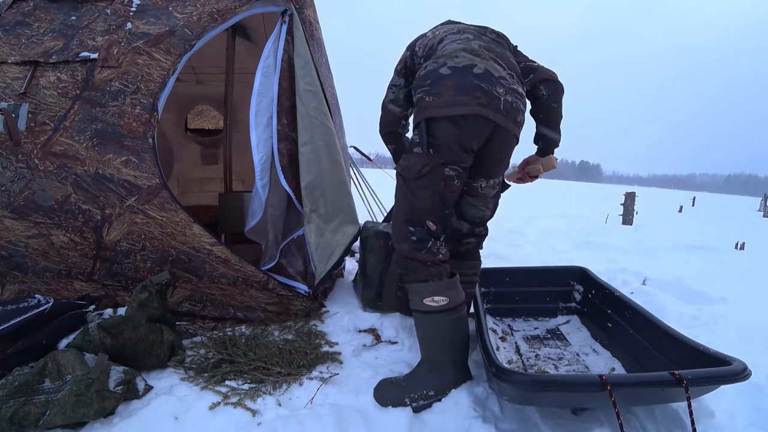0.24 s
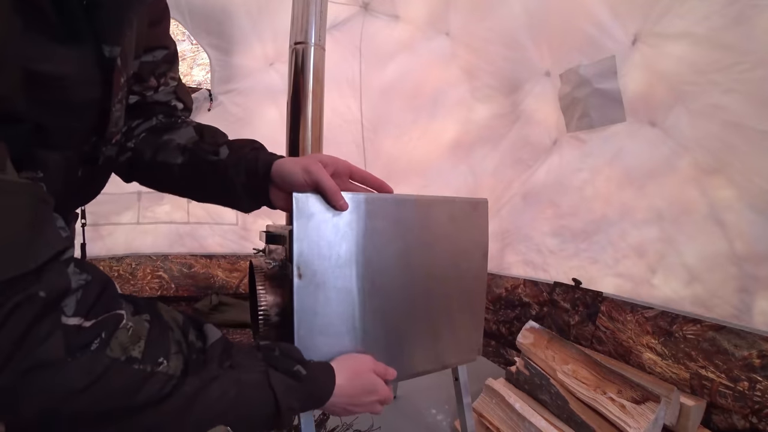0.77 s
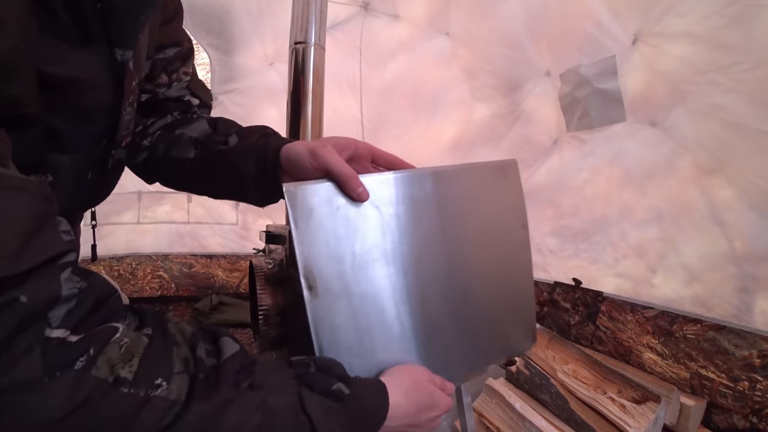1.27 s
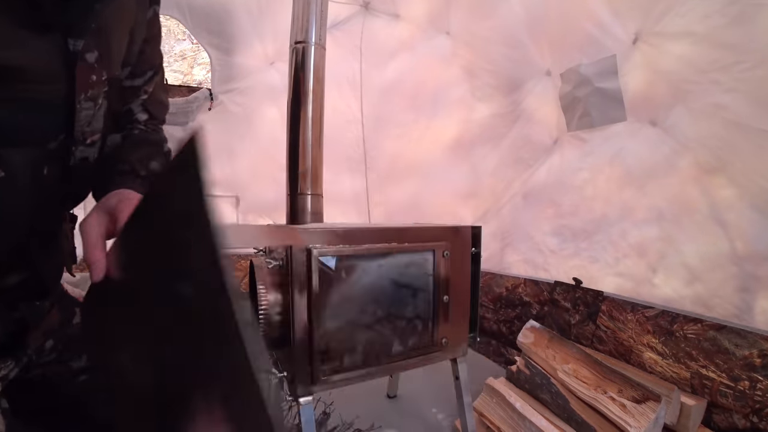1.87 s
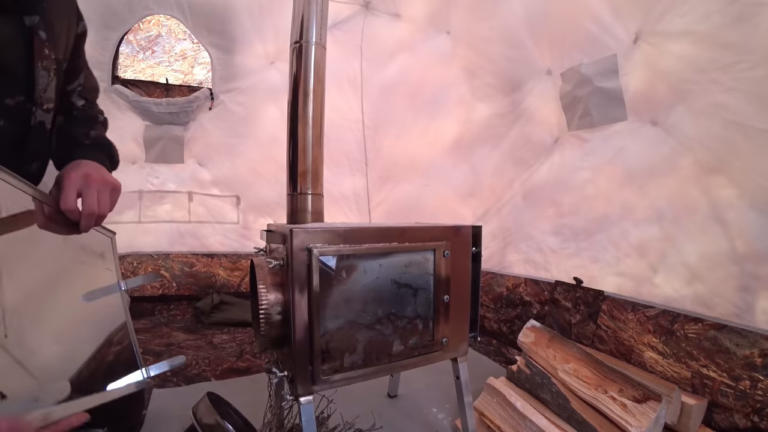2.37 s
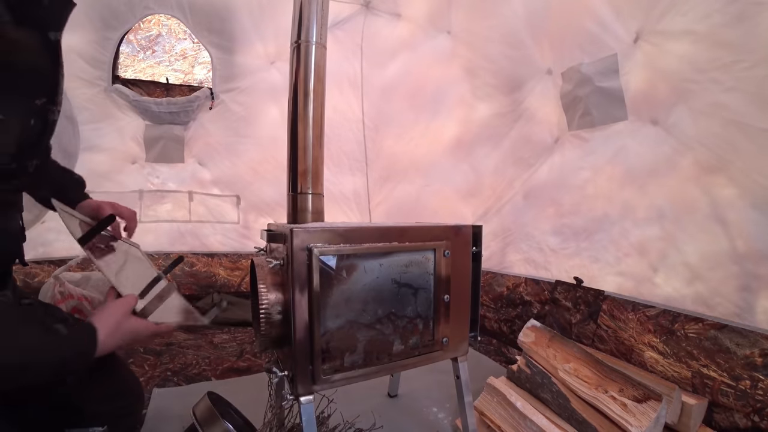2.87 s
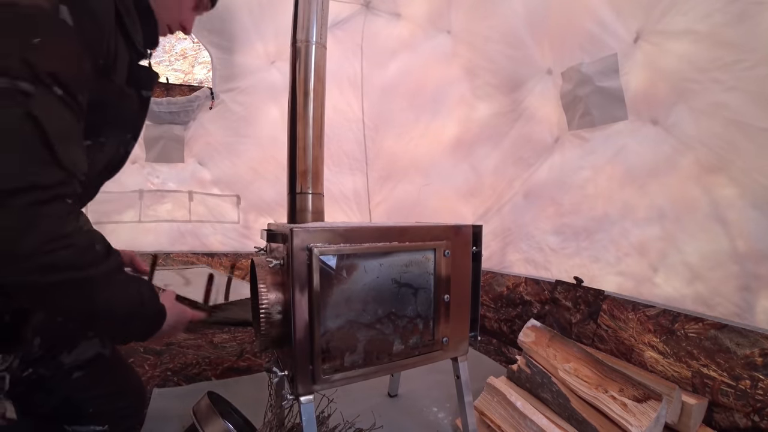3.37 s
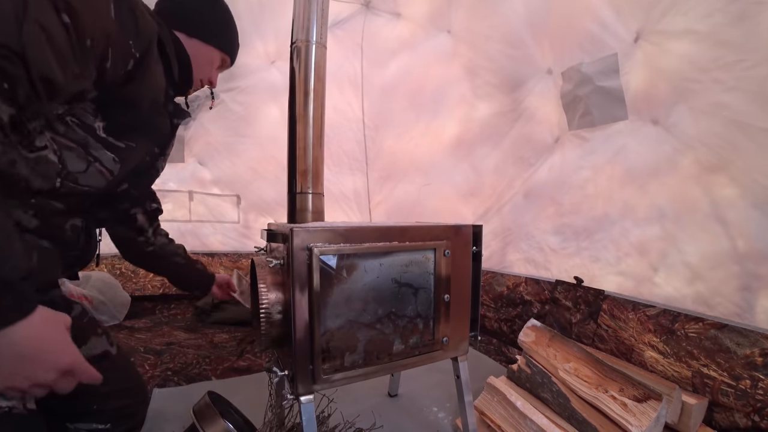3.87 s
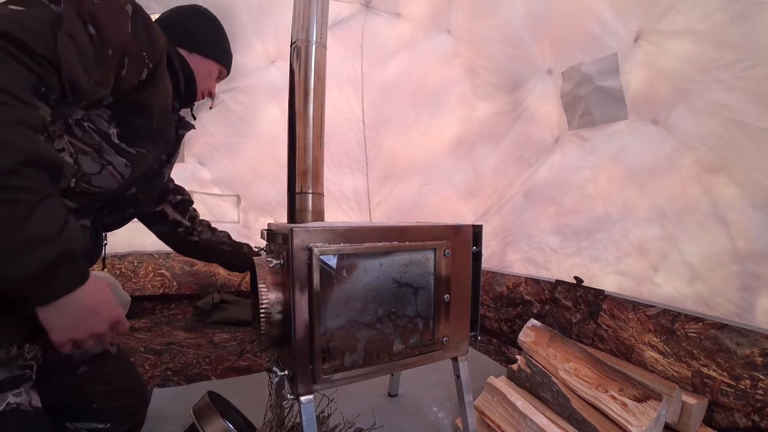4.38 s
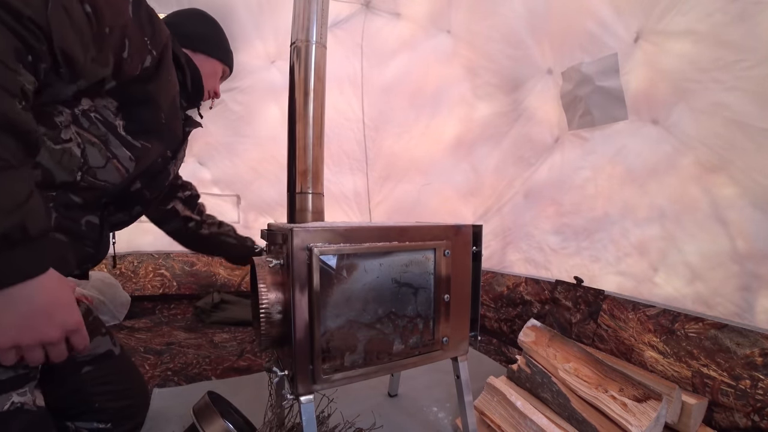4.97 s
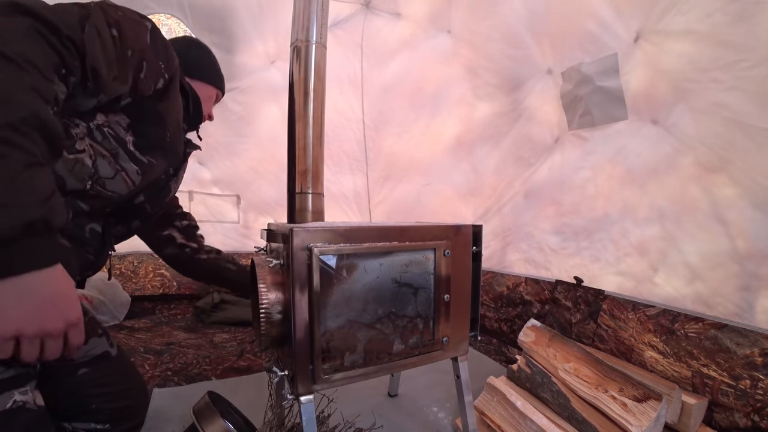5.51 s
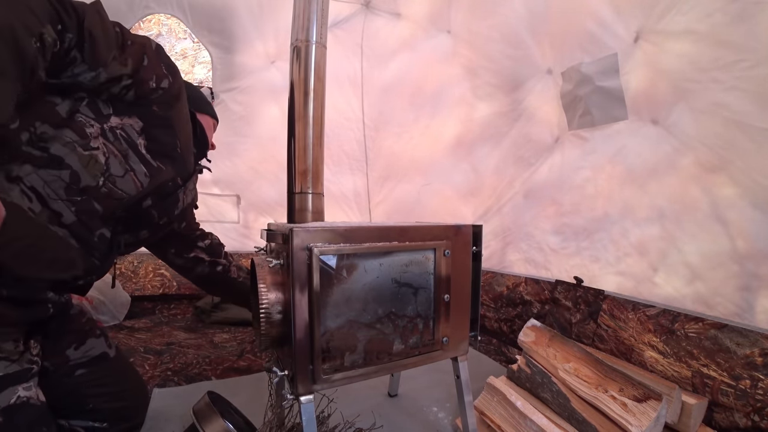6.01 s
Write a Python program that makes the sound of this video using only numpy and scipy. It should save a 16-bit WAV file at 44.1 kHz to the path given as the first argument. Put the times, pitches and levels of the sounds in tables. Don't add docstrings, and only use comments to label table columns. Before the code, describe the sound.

A gust and small snaps cut to a hushed tent: sheet metal scrapes and bangs, clothing rustles, a stove door groans, clanks, clicks, wood knocks.

```python
import sys
import numpy as np
from scipy import signal
from scipy.fft import rfft, irfft
from scipy.io import wavfile

SR = 44100
rng = np.random.default_rng(int(sys.argv[2]) if len(sys.argv) > 2 else 0)


def amplitude_ratio(level_db):
    exponent = np.asarray(level_db, float) / 20
    return 10 ** exponent


def bounce(signal):
    frames = np.transpose(np.atleast_2d(signal))
    limited = np.clip(frames, -1, 1)
    pcm = np.round(limited * 32767).astype(np.int16)
    wavfile.write(sys.argv[1], SR, pcm)


N = 275625
INDOORS_S = 0.58

# [f/Hz, side minus mid/dB]
SOFT_SIDE = [(60, -22), (110, -8), (200, -7.5), (380, -4), (700, -0.5), (1290, 0), (2380, -5), (4400, -8),
             (8120, -5), (15000, -6)]
# [f/Hz, level/dB]
SHEET_CROWD = [(40, -42), (100, -6), (500, -5), (1000, -6.5), (2200, -7.5), (4200, -6), (7000, -11.5),
               (9500, -20), (11500, -16), (15500, -31)]
# [f/Hz, level/dB]
STOVE_CROWD = [(60, -41), (170, -10), (330, -13), (480, -8), (1070, -11), (2530, -6.5), (6260, -10),
               (9500, -23), (15500, -31.5)]


def colour(x, table):
    hz, db = np.transpose(table)
    log_hz = np.log(np.arange(1, x.shape[-1] // 2 + 2) * SR / x.shape[-1])
    return irfft(rfft(x) * amplitude_ratio(np.interp(log_hz, np.log(hz), db)), x.shape[-1])


def band(x, lo_hz, hi_hz):
    y = signal.sosfilt(signal.butter(2, [lo_hz, hi_hz], "bandpass", fs=SR, output="sos"), x)
    return y / np.sqrt(np.mean(y ** 2))


def curves(tables, rest_db):
    rows = []
    for span in map(np.array, tables):
        if rest_db is not None:
            quiet = np.full(span.shape[1] - 1, rest_db)
            before = np.r_[span[0, 0] - 0.006, quiet]
            after = np.r_[span[-1, 0] + 0.006, quiet]
            span = np.vstack([before, span, after])
        rows.append(span)
    s, *columns = np.vstack(rows).T
    return [np.interp(np.arange(N) / SR, s, c) for c in columns]


def swells(at_s, rise_s, fall_s, peak_db):
    t = np.arange(0, N, 32) / SR
    late = t - at_s[:, None]
    drop_db = 10 * np.maximum(-late / np.abs(rise_s)[:, None], late / np.abs(fall_s)[:, None])
    same_place = (at_s[:, None] < INDOORS_S) == (t < INDOORS_S)
    power = 1e-12 + (same_place * amplitude_ratio(peak_db[:, None] - drop_db) ** 2).sum(axis=0)
    return np.interp(np.arange(N) / SR, t, 10 * np.log10(power))


def wide(mid, other, side_db):
    side = colour(other, side_db)
    return np.array([mid + side, mid - side])


def pan(db):
    return amplitude_ratio(np.array([[db], [-db]]) / 2)


def grit(rate_hz, spread_db, size=N):
    hit = rng.random((2, size)) < rate_hz / SR
    big = np.minimum(rng.exponential(size=(2, size)), 3)
    return hit * rng.standard_normal((2, size)) * amplitude_ratio(spread_db * big)


def hum(table, rough_db):
    hz, db = curves(table, None)
    start, end = table[0][0][0], table[0][-1][0]
    held = np.interp(np.arange(N) / SR, [start - 0.02, start, end, end + 0.02], [0, 1, 1, 0])
    db = db + rough_db * band(rng.standard_normal(N), 6.3, 44.0)
    return held * np.sqrt(2) * amplitude_ratio(db) * np.sin(2 * np.pi * np.cumsum(hz) / SR)


def steel(modes, shape, crowd_db, t60_low, t60_high, blows=(), scrape=None, rub_db=0.0):
    # [f/Hz, side minus mid/dB]
    steel_side = [(100, -14), (500, -12.5), (1500, -11), (3000, -11), (8000, -7), (15000, -9)]
    t = np.arange(SR // 3) / SR
    hz, db, t60 = np.transpose(modes)[:, :, None]
    swing = amplitude_ratio(db - 60 * t / t60) * np.exp(2j * np.pi * hz * t)
    detune_hz = hz * 0.015 * rng.uniform(-1, 1, hz.shape)
    swing = swing * (1 + 0.45 * np.exp(2j * np.pi * detune_hz * t))

    def body(modes_db, place_db):
        gain = amplitude_ratio(place_db * rng.standard_normal(len(modes)))
        share = gain * np.exp(2j * np.pi * rng.random((2, len(modes))))
        lines = rng.random(len(t) // 2 + 1) < 0.14
        crowd = colour(irfft(lines * rfft(rng.standard_normal((2, len(t))))), shape)
        low = signal.sosfilt(signal.butter(1, 2500, fs=SR, output="sos"), crowd)
        fading = low * amplitude_ratio(-60 * t / t60_low) + (crowd - low) * amplitude_ratio(-60 * t / t60_high)
        both = amplitude_ratio(modes_db) * (share @ swing).imag + amplitude_ratio(crowd_db) * fading / crowd.std()
        both = wide(*both, steel_side) * np.minimum(t / 0.00093, 1)
        return both / np.abs(both).max()

    sharp, dull = np.zeros((2, 2, N + len(t)))
    for s, peak_db, dull_db, pan_db in blows:
        sound = body(0.0, 1.5) * pan(pan_db)
        sharp[:, int(s * SR):][:, :len(t)] += amplitude_ratio(peak_db) * sound
        dull[:, int(s * SR):][:, :len(t)] += amplitude_ratio(dull_db + 7.5) * sound
    if scrape:
        rows = [[(s, db, db + under_db) for s, db in curve] for under_db, curve in scrape]
        sharp_db, dull_db = curves(rows, -110.0)
        a, b = int(rows[0][0][0] * SR) - 300, int(rows[-1][-1][0] * SR) + 300
        place = np.repeat(rng.integers(0, 4, N // 530 + 1), 530)[:b - a]
        slips = grit(6000, 1.4, size=b - a)
        for k in range(4):
            sound = body(rub_db, 3.0)
            push = slips * (place == k) / slips.std() / np.sqrt((sound ** 2).sum() / 2)
            sharp_push = amplitude_ratio(sharp_db[a:b]) * push[:1]
            dull_push = amplitude_ratio(dull_db[a:b] + 12.0) * push[1:]
            sharp[:, a:b + len(t) - 1] += signal.oaconvolve(sharp_push, sound, axes=1)
            dull[:, a:b + len(t) - 1] += signal.oaconvolve(dull_push, sound, axes=1)
    heard = np.flatnonzero(sharp[0])
    heard = slice(heard[0], heard[-1])
    hard = signal.sosfilt(signal.butter(2, 900, "high", fs=SR, output="sos"), sharp[:, heard])
    soft = signal.sosfilt(signal.butter(2, 900, fs=SR, output="sos"), dull[:, heard])
    sharp[:, heard] = soft * pan(-2.3) - hard
    return sharp[:, :N]


def ports(x):
    # [f/Hz, lead of the left port/rad]
    steel_lead = [(100, -.2), (400, -.55), (950, -.45), (2150, -.14), (3800, 0.), (15000, -.1)]
    hz, lead = np.transpose(steel_lead)
    turn = np.interp(np.log(np.arange(1, N // 2 + 2) * SR / N), np.log(hz), lead)
    return irfft(rfft(x) * np.exp(0.5j * turn * np.array([[1], [-1]])), N)


def air():
    # [t/s, level/dB]
    wind = [
        (0.0, -43),
        (0.134, -38),
        (0.358, -42),
        (0.43, -37.5),
        (0.5, -43.5),
        (0.56, -45),
        (0.578, -50),
    ]
    # [t/s, rise/s per 10 dB, fall/s per 10 dB, level/dB]
    jolts = [
        (0.69, .1, -0.3, -54),
        (0.94, -0.5, .05, -52),
        (1.15, 0.1, 0.08, -41),
        (1.36, .02, -0.07, -43),
        (4.2, 0.5, 0.3, -65),
    ]
    # [f/Hz, level/dB]
    tent = [(15, -25), (25, -8), (79, -1), (148, -5), (260, -11.5), (582, -8), (997, -10.5), (1140, -9),
            (1300, -12.5), (1660, -10.5), (5580, -12), (8130, -21.5), (15500, -24)]
    still_air_db, hush_db = -73.5, -61.5
    push = amplitude_ratio(curves([wind], -110.0)[0]) + amplitude_ratio(swells(*np.transpose(jolts))) + amplitude_ratio(still_air_db)
    gusts = push * band(rng.standard_normal(N), 5.8, 43.5)
    hush = wide(*colour(rng.standard_normal((2, N)), tent), SOFT_SIDE)
    uneven = amplitude_ratio(-11.5) * gusts * np.array([[1], [-1]]) * band(rng.standard_normal(N), 1, 11)
    return gusts * pan(1.4) + uneven + amplitude_ratio(hush_db) * hush / hush.std()


def thuds():
    # [t/s, peak/dB, f/Hz]
    knocks = [(0.903, -36, 290), (0.943, -41, 140), (0.999, -35, 146), (1.137, -32.5, 241),
              (1.59, -41, 100), (1.657, -44, 78.1), (2.658, -46.5, 387), (2.772, -35, 113),
              (2.81, -47, 123), (3.278, -44.5, 190), (3.315, -48, 185), (3.41, -52, 94.2),
              (3.481, -37, 138), (3.616, -41, 104), (3.681, -45.5, 105), (3.796, -51, 106),
              (4.413, -48, 119), (4.962, -50, 106.6)]
    out, t = np.zeros(N + SR), np.arange(SR // 5) / SR
    for s, db, hz in knocks:
        out[int(s * SR):][:len(t)] += amplitude_ratio(db - 60 * t / 0.08) * np.sin(2 * np.pi * hz * t)
    return out[:N]


def clothes():
    # [t/s, rise/s per 10 dB, fall/s per 10 dB, hiss/dB]
    rustle = [ (0.08, 4, 0.3, -48.5), (0.27, 0.1, .05, -50.5), (0.36, .03, .02, -51),
              (0.43, .015, .05, -52), (0.575, 0.27, .02, -49), (0.67, 0.2, .5, -53), (1.6, .04, .5, -63),
              (1.97, 0.3, 0.35, -52), (2.52, .03, .06, -53), (2.555, .04, 0.06, -51), (2.7, .07, .04, -51),
              (2.79, 0.08, .06, -52), (2.915, .06, 0.08, -56), (3.2, .15, .2, -61),
              (3.27, -0.3, 0.16, -55.5), (3.49, 0.1, 0.16, -57), (3.61, 0, 0.57, -61),
              (4.038, 0.0267, 0.0436, -37.5), (4.243, 0.01, 0.31, -46.5), (4.576, 0.24, 0.04, -44),
              (4.86, 0.4, 0.02, -55.5), (4.966, 1, -1, -64.5), (5.13, 0.14, .3, -59), (5.39, 1, .04, -63),
              (5.75, .25, 5, -60), (6.02, 0.07, 0, -57.5), ]
    # [t/s, rise/s per 10 dB, fall/s per 10 dB, crumple/dB, thud/dB]
    shuffle = [ (0.08, 0.16, 0.21, -44.5, -47), (0.304, 0, 0, -50, -56), (0.575, 0.1, -1, -43, -44),
               (0.621, 3, 0, -69, -59), (0.684, 0, 0.07, -53.5, -46), (0.89, .03, 0.37, -49, -53),
               (1.49, 1.2, -1.7, -79, -58.5), (1.592, 0, 0.07, -51.5, -44), (1.83, 0.7, 0, -60, -60),
               (2.12, 0.13, 0.17, -55.5, -54), (2.56, 0.2, 0.5, -59, -63), (2.798, 0.03, 0.04, -53.5, -51),
               (2.92, -1.2, 0.12, -65, -62), (3.28, 0, 0.2, -62.5, -63), (3.49, 0.04, 0.02, -54, -50),
               (3.615, .01, .08, -61, -56.5), (3.85, 0.5, 0.3, -61, -70), (4.015, 0.02, 0, -51, -57),
               (4.3, 0.13, 0.18, -69, -56.5), (4.441, -0.13, 0.17, -57.5, -60), (4.83, -0.1, .06, -61, -58),
               (5.3, 0.54, 0.22, -66, -63.5), (6.02, 0.5, 1.1, -62, -66), ]
    air_under_hiss_db, crumple_under_hiss_db = -16, -13.5
    hiss = amplitude_ratio(swells(*np.transpose(rustle)))
    *shape, crumple_db, thud_db = np.transpose(shuffle)
    crumple = np.hypot(amplitude_ratio(swells(*shape, crumple_db)), amplitude_ratio(crumple_under_hiss_db) * hiss)
    levels = [hiss, crumple, amplitude_ratio(swells(*shape, thud_db)), amplitude_ratio(air_under_hiss_db) * hiss]
    bands_hz = [(1600, 5970), (317, 1850), (64.4, 394), (9700, 13400)]
    out = 0
    for level, (lo_hz, hi_hz) in zip(levels, bands_hz):
        flicker = band(rng.standard_normal(N), 6, 43)
        fibres = rng.standard_normal((2, N)) + 1.9 * grit(700, 3.0)
        out = out + level * amplitude_ratio(1.22 * flicker) * wide(*band(fibres, lo_hz, hi_hz), SOFT_SIDE)
    return out * pan(0.7)


def crackle():
    # [t/s, peak/dB, f/Hz, t60/s]
    cracks = [(0.258, -44, 12000, .006), (0.2613, -42, 7600, .008), (0.265, -44, 10000, .006),
              (0.3112, -41, 14000, .003), (0.345, -40, 7840, 0.011), (0.3501, -38, 10000, .003),
              (0.366, -42, 8000, .006), (0.358, -38, 3000, .006), (0.363, -36, 5200, .008),
              (0.363, -34, 1000, 0.013), (0.469, -37, 3390, 0.043), (0.488, -39, 5400, .01),
              (0.495, -38, 11000, .0035), (0.508, -35, 4420, .012), (0.5538, -34, 1200, .015),
              (4.441, -38, 1700, .02), (4.671, -21, 540, .035), (6.237, -40, 915, .1),
              (6.24, -44, 2600, 0.042)]
    out, t = np.zeros(N + SR), np.arange(SR // 10) / SR
    for s, db, hz, t60 in cracks:
        ring = amplitude_ratio(db - 60 * t / t60) * np.sin(2 * np.pi * hz * t)
        out[int(s * SR):][:len(t)] += ring * np.minimum(t * hz / 2, 1)
    return out[:N] * pan(1.5)


def ticks():
    # [f/Hz, level/dB, t60/s]
    tick = [(1160, -16, .02), (3350, 1.5, 0.02), (5200, -16, 0.013)]
    snap = [(4060, 2, 0.016), (4670, 3.5, 0.015), (5430, -2.5, 0.019), (11000, -2, 0.0087)]
    # [t/s, peak/dB, dull part/dB, left minus right/dB]
    tick_blows = [
        (0.3427, -34.5, -59, 1.5),
        (0.4224, -45, -40, 2.7),
        (0.4683, -36, -38, 4.8),
        (0.508, -32, -32.5, 4.5),
        (0.5547, -37, -36, 3),
        (0.6297, -40.5, -66, 0.5),
        (3.5752, -54, -66, 1.1),
        (3.9824, -38, -40.5, 0.5),
        (5.744, -45, -62.5, 0.5),
    ]
    snap_blows = [
        (0.182, -25, -55, 2.0),
    ]
    out = steel(tick, STOVE_CROWD, 6.0, 0.089, 0.015, tick_blows)
    return out + steel(snap, SHEET_CROWD, 3.4, 0.0049, 0.019, snap_blows)


def wood():
    # [f/Hz, level/dB, t60/s]
    modes = [(140, 2, .14), (255, 5, .07), (290, -2, .25), (410, -1, .14), (940, -15, .2),
             (2020, -1.5, .06), (4410, -7, .063)]
    # [t/s, peak/dB, dull part/dB, left minus right/dB]
    blows = [
        (6.067, -27, -42, 0.74),
        (6.071, -23, -37, 0.8),
        (6.078, -21, -41, 0.91),
        (6.237, -36, -50, 0.),
    ]
    return steel(modes, STOVE_CROWD, 4.1, 0.15, 0.18, blows)


def latch():
    # [f/Hz, level/dB, t60/s]
    modes = [(422, -5, 0.093), (770, -9, 0.11), (888, 1, 0.12), (2094, 0.5, 0.074), (3020, -11, 0.25),
             (3570, -25, 0.19), (4610, -4.5, 0.19), (6720, -3, 0.16)]
    # [f/Hz, level/dB]
    crowd = [(35, -52), (90, -7), (413, 1), (673, -23), (869, -7), (976, -10), (3340, -5), (6560, -7.5),
             (15500, -28)]
    # [t/s, peak/dB, dull part/dB, left minus right/dB]
    blows = [
        (5.1575, -15.5, -26, 0.19),
        (5.168, -20, -37, 1.),
        (5.183, -24.5, -37, 0.),
    ]
    return steel(modes, crowd, 8.8, 0.2, 0.18, blows)


def door():
    # [f/Hz, level/dB, t60/s]
    clank = [(190, -12, .1), (404, -3, .2), (566, 7, .045), (1010, -11, 0.17), (1645, -6, 0.091),
             (1860, -5, 0.13), (2270, -6, 0.22), (2525, 0, 0.26), (3740, -5.5, .15), (4160, -6, .2),
             (4890, -3.5, 0.12), (5600, -6, .1), (6223, -9, 0.1), (7520, -10, 0.14)]
    rebound = [(404, -2, .22), (440, -12, .1), (592, -5, .2), (1327, -0.5, 0.13), (2030, -4, 0.11),
               (2500, -5, .08), (2790, -5, .1), (3300, -7, 0.087), (3800, -1, .06), (4300, -2, 0.11),
               (4510, 0, 0.12), (5190, -10, .08)]
    # [t/s, peak/dB, dull part/dB, left minus right/dB]
    clank_blows = [
        (4.6027, -9, -14, 0.),
        (4.6113, -6.5, -18, 1.6),
        (4.619, -7, -43, 0.035),
        (4.626, -8.5, -32, 0.),
        (4.635, -13.5, -33, 0.),
    ]
    rebound_blows = [
        (4.44, -38, -56, 0.),
        (4.453, -42, -56, 0.),
        (4.672, -24, -50, 1.),
        (4.716, -28, -30, 1.),
        (4.726, -23, -29, 1.),
        (4.745, -32, -44, 1.),
    ]
    # [t/s, level/dB]
    scrape = [
        (-18.5, [(4.43, -45), (4.462, -44), (4.57, -55)]),
        (-16, [(4.64, -32), (4.665, -29), (4.695, -32.5), (4.705, -35), (4.726, -32), (4.765, -41), (4.81, -52.5), (4.836, -50), (4.86, -70.5)]),
    ]
    # [t/s, f/Hz, level/dB]
    squeak = [
        [(4.465, 440, -66), (4.49, 540, -58), (4.515, 694, -56), (4.535, 770, -66)],
    ]
    groan = [
        [(4.44, 387, -59), (4.5, 396, -62), (4.53, 435, -54), (4.555, 461, -52), (4.585, 454, -54)],
    ]
    out = steel(clank, STOVE_CROWD, 9.8, 0.053, 0.12, clank_blows)
    out += steel(rebound, STOVE_CROWD, 5.1, 0.11, 0.076, rebound_blows, scrape, -11.0)
    return out + hum(squeak, 2.5) + hum(groan, 2.5)


def shield_laid_down():
    # [f/Hz, level/dB, t60/s]
    pin = [(1410, 1, .16), (2710, -1, .1), (2880, 1, .2), (4600, 1, .12), (7290, -4, .06)]
    tab = [(960, -5, .15), (2070, -8, 0.11), (2640, -3, 0.12), (3065, -0.5, 0.11), (3400, -11, 0.089),
           (3570, -10, .1), (4250, -6, .06), (4500, 0, .1), (4620, -1, .15), (4800, -6, .08),
           (5370, -8, .08), (6100, -9, .1), (8020, -8, .06)]
    clink = [(1428, -1.5, 0.13), (1541, -11, 1.3), (2630, -1, 0.1), (2860, 3, .1), (3100, -2, .07),
             (4000, -7, .05), (6000, -6, .05), (8190, 0.5, .07)]
    # [t/s, peak/dB, dull part/dB, left minus right/dB]
    pin_blows = [
        (2.1887, -29, -44, .5),
        (2.1961, -31, -48, .5),
    ]
    tab_blows = [(2.1326, -35, -40, 1.53), (2.2217, -36, -48, 3), (2.2456, -22, -52, 4.2),
                 (2.251, -27, -52, 3.7), (2.262, -30, -54, 3.7), (2.285, -28, -46, 4.3),
                 (2.299, -30, -48, 5), (2.318, -36, -54, 4), (2.338, -47, -56, 4), (2.515, -43, -52, 2.5),
                 (2.6989, -40, -66, 2.9), (2.7655, -37.5, -43, 2.2)]
    clink_blows = [
        (2.912, -38, -64, 1.5),
        (2.92, -38, -64, 1.5),
    ]
    # [t/s, level/dB]
    tab_scrape = [
        (-13.5, [(2.1, -51), (2.144, -50), (2.244, -35.5), (2.308, -45), (2.38, -67)]),
    ]
    out = steel(pin, SHEET_CROWD, 7.5, 0.046, 0.051, pin_blows)
    out += steel(tab, SHEET_CROWD, 8.0, 0.06, 0.07, tab_blows, tab_scrape, -8.0)
    return out + steel(clink, SHEET_CROWD, 3.5, 0.1, 0.064, clink_blows)


def shield_unhooked():
    # [f/Hz, level/dB, t60/s]
    slide = [(751, 1, 0.13), (915, -3.5, 0.14), (1200, -2.5, .1), (2580, -4, .08), (3500, -2, .08),
             (4230, -4, .04)]
    hook = [(623, -1, .3), (1062, -3.5, .22), (1368, 2, .22), (2140, -2, .25), (2417, 1, .18),
            (3060, -11.5, 0.15), (3560, -5, 0.13), (4140, -4, .11), (5100, -10, 0.13), (5620, -8, .12),
            (6050, -11, .1), (6780, -10.5, 0.17), (7284, -9, .2)]
    lug = [(954, 2, 0.12), (1713, -7.5, 0.13), (2160, -7.5, .12), (2555, -5, .08), (2940, -2, 0.07),
           (3960, -8.5, 0.082), (4200, -5, 0.098), (4600, -3.5, 0.06), (5060, -9, .1), (6000, -6.5, .1),
           (6900, -9, .07)]
    rim = [(520, -12.5, 0.24), (670, -2, .083), (856, -2, 0.13), (960, -6, .1), (1071, 1, .19),
           (1670, 4.5, 0.079), (1776, 2, 0.095), (2022, 0, 0.1), (2610, -3.5, .11), (2750, -4.5, 0.086),
           (3490, -8, 0.1), (4441, -1.5, 0.2), (4721, -2, 0.18), (5140, -3, 0.058), (6000, -5, 0.15)]
    # [t/s, peak/dB, dull part/dB, left minus right/dB]
    hook_blows = [
        (1.0784, -2.5, -44, -0.5),
    ]
    lug_blows = [
        (1.1446, -22, -34, 0.5),
        (1.1935, -10, -34, 0.61),
        (1.2284, -7, -40, 0.085),
        (1.2336, -11, -34, -0.5),
    ]
    rim_blows = [
        (1.3385, -36, -38, 0.89),
        (1.356, -2.5, -14, -0.58),
        (1.364, -7, -17, 0.),
        (1.373, -12, -19, 0.),
    ]
    # [t/s, level/dB]
    slide_scrape = [
        (-11, [(0.908, -48), (0.917, -33), (0.955, -32), (0.985, -39), (1.015, -37), (1.045, -43.5), (1.065, -39)]),
    ]
    hook_scrape = [
        (-17, [(1.125, -26.5), (1.15, -23.5), (1.19, -27), (1.215, -30), (1.25, -27), (1.283, -34.5), (1.325, -49), (1.337, -37), (1.354, -32)]),
    ]
    # [t/s, f/Hz, level/dB]
    wobble = [
        [(1.138, 132.7, -67), (1.298, 145, -46.5), (1.428, 124, -42.5), (1.45, 127.6, -61),
         (1.538, 142.3, -59.5), (2.012, 145.1, -66.5), (2.312, 155, -55), (2.4, 140, -104)],
    ]
    out = steel(slide, SHEET_CROWD, 9.8, 0.055, 0.027, scrape=slide_scrape, rub_db=-7.0)
    out += steel(hook, SHEET_CROWD, 6.2, 0.29, 0.31, hook_blows)
    out += steel(lug, SHEET_CROWD, 7.7, 0.076, 0.037, lug_blows, hook_scrape, -11.0)
    out += steel(rim, SHEET_CROWD, 9.7, 0.16, 0.17, rim_blows)
    return out + hum(wobble, 6.5)


def scene():
    background = air() + thuds() + clothes()
    small = crackle() + ticks() + wood()
    stove = latch() + door()
    shield = shield_laid_down() + shield_unhooked()
    return background + small + ports(stove + shield)


def roll_off(x):
    return signal.sosfilt(signal.butter(12, 16960, fs=SR, output="sos"), x)


def record(dry):
    headroom, top_hz = 0.73, 15800
    rounded = headroom * np.tanh(dry / headroom)
    mix = signal.sosfilt(signal.ellip(6, 0.2, 26, top_hz, fs=SR, output="sos"), rounded)
    return roll_off(mix)


dry = scene()
out = record(dry)
bounce(out)
```